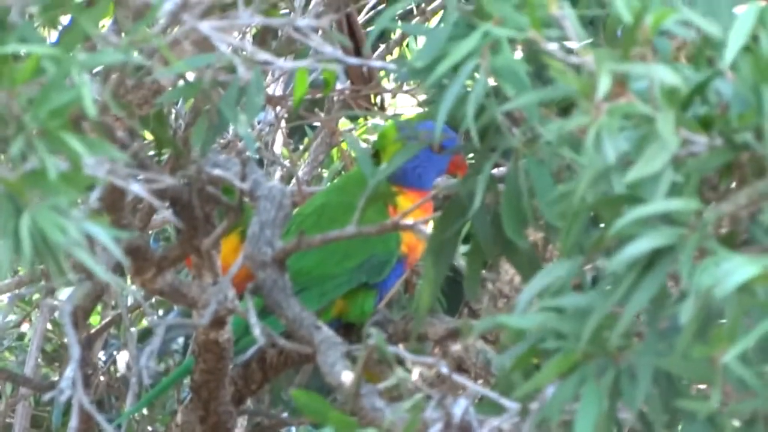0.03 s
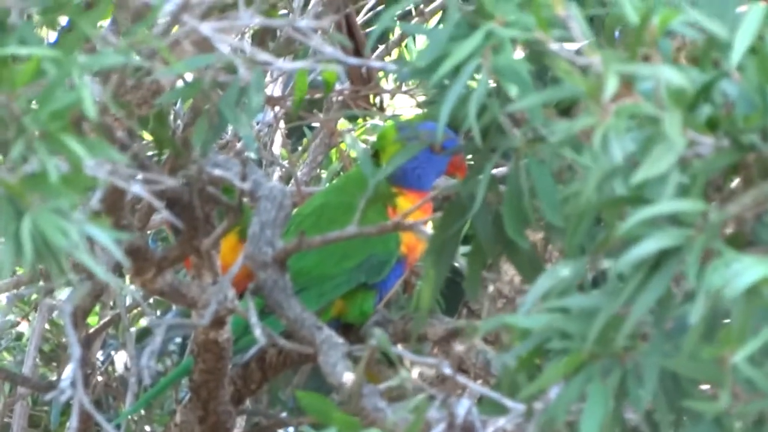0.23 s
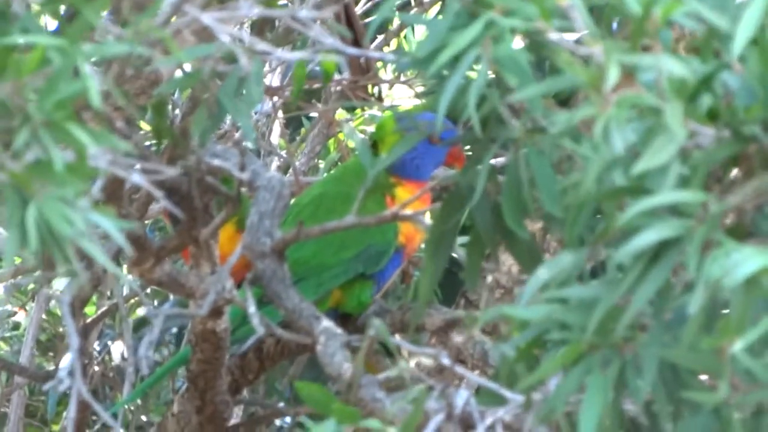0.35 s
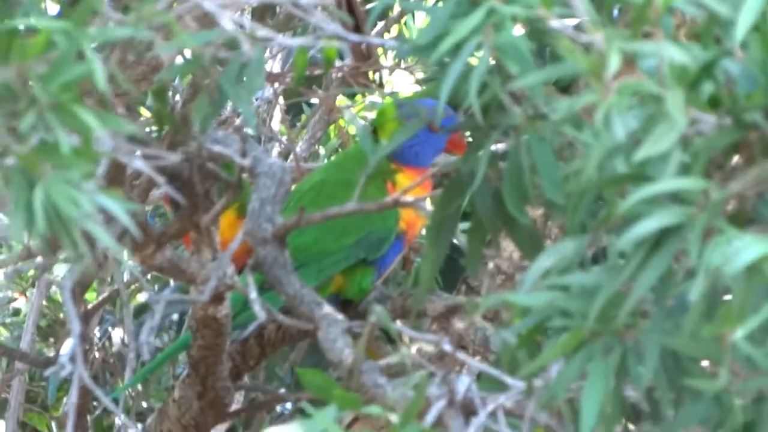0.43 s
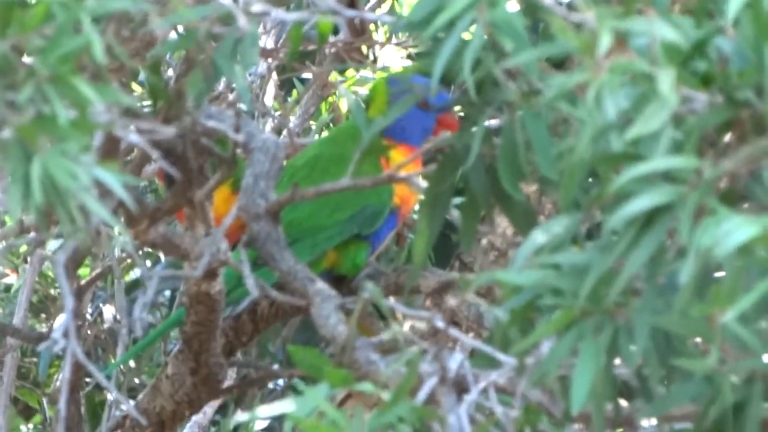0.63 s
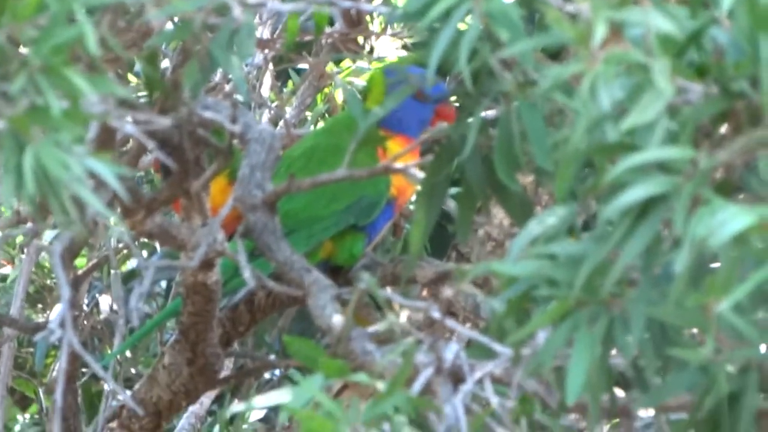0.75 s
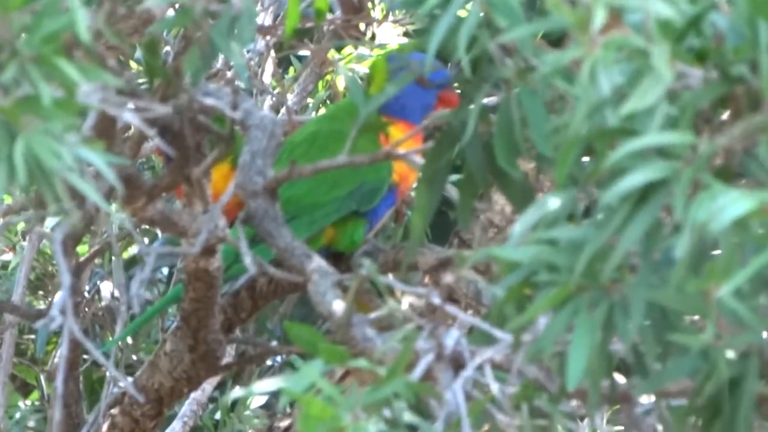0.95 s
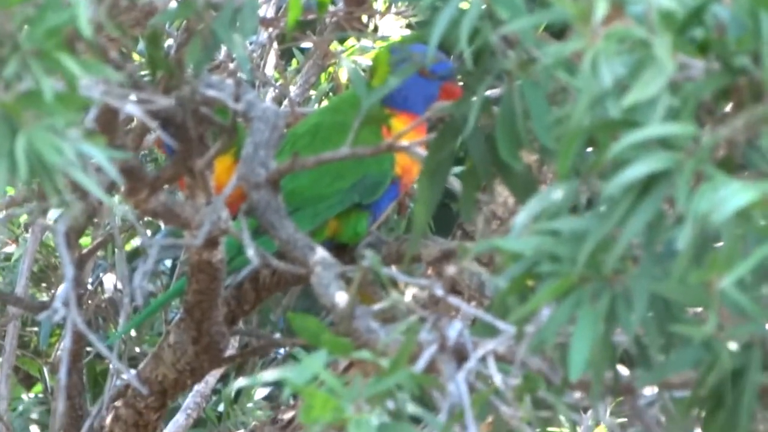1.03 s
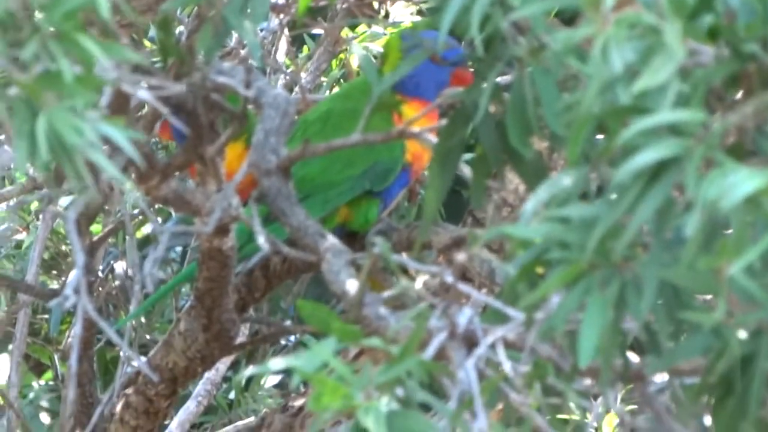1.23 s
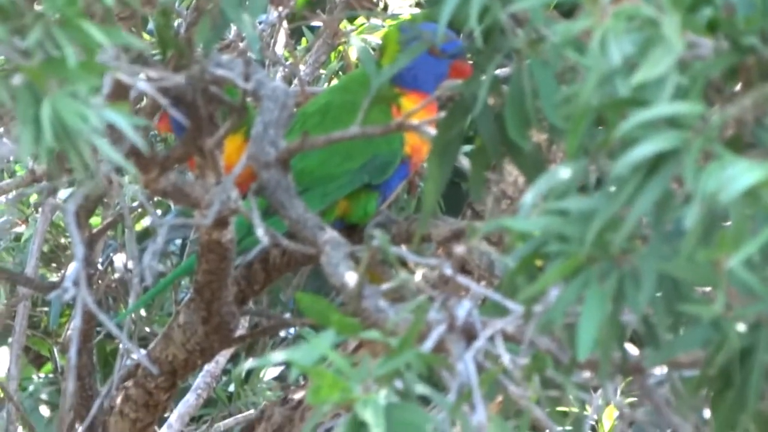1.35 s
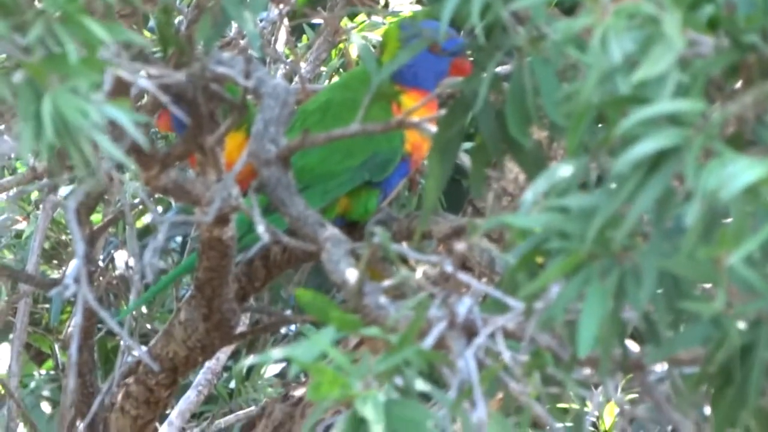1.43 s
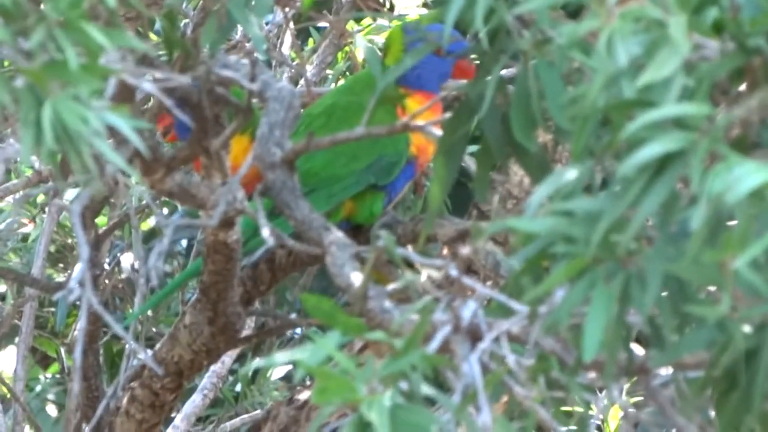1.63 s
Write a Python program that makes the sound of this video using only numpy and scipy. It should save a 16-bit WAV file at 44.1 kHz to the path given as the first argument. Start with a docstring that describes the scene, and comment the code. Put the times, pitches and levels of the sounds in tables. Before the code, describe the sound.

Quiet, quick bird chatter comes first, then a pause and one piercing, raspy parrot screech sliding downward; its echo fades into airy outdoor hiss and a faint far drone, heard in stereo from nearby.

```python
"""In a leafy tree, a lorikeet chatters softly, then gives one harsh squawk that falls by about an octave.
The squawk is a jittery stack of partials, some at thirds of its pitch; a second, higher tone joins near the end.
The chatter and second tone are short gliding notes. Decaying noise echoes scatter the voice off the leaves.
Behind are filtered-noise outdoor hiss and a faint drone of steady multiples, like a far small engine."""
import sys
import numpy as np
from scipy import signal
from scipy.fft import rfft, irfft
from scipy.io import wavfile

SR = 44100
rng = np.random.default_rng(int(sys.argv[2]) if len(sys.argv) > 2 else 0)


def inscribe(sig):
    """Save sig as 16-bit PCM at rate SR to the path in sys.argv[1].

    A 1-D sig is mono; a 2-D sig holds one channel per row.
    Samples are clipped to [-1, 1] before scaling.
    """
    pcm = np.round(np.clip(np.atleast_2d(sig).T, -1, 1) * 32767)
    wavfile.write(sys.argv[1], SR, pcm.astype(np.int16))


N = 74970
TIME = np.arange(N) / SR
SIDES = np.array([[1], [-1]])  # sign of a left-right difference in each ear
CUTOFF_HZ = 15650  # top of the whole sound
JITTER_HZ = 160  # fastest wander of the bird's pitch


def from_db(db):
    """Turn decibels into gain."""
    return 10 ** (np.asarray(db) / 20)


def rms_one(x):
    """Scale to unit power."""
    return x / np.sqrt(np.mean(np.abs(x) ** 2) + 1e-20)


def in_time(rows):
    """Turn each column of a table into a curve over time."""
    s, *columns = np.transpose(rows)
    return [np.interp(TIME, s, column) for column in columns]


def at_hz(points, hz):
    """Read a spectrum on a log-frequency axis."""
    table_hz, table_db = np.transpose(points)
    return np.interp(np.log(hz), np.log(table_hz), table_db)


def butter(order, hz, kind="low"):
    """Design a smooth filter that passes one side of a frequency, or a band."""
    return signal.butter(order, hz, kind, fs=SR, output="sos")


def drift(hz, size=N):
    """Random wander, made of noise below the given rate, with a spread of about 1."""
    run_in = 4000  # samples dropped while the filter settles
    noise = rng.standard_normal(size + run_in)
    return rms_one(signal.sosfilt(butter(2, hz), noise))[run_in:]


def partial(phase, rough, width_hz):
    """One partial, with a share of its power smeared into a band around it."""
    rough, size = np.clip(rough, 0, 1), len(phase)
    clean = np.sqrt(2 * (1 - rough)) * np.cos(phase)
    smeared = drift(width_hz, size) * np.cos(phase) + drift(width_hz, size) * np.sin(phase)
    return clean + np.sqrt(rough) * smeared


# how the squawk's voice changes: start_s, pitch_hz, roughness (0-1, before the shares below),
# thirds_db (partials between whole multiples), fundamental_db (extra), tilt_db (per octave above the pitch)
SQUAWK = [(0.575, 2587, 0.16, 0.5, 19, 7), (0.594, 2700, 0.17, -3.5, 3, 7), (0.612, 2566, 0.1, -6.5, 9, 4),
          (0.617, 2083, 0.3, -13.5, 0.5, -3), (0.643, 2008, 0.18, -18, 3, -1.5),
          (0.668, 1900, 0.5, -0.5, 12.5, 1.5), (0.695, 1786, 0.34, -9, 13, 1.5),
          (0.722, 1675, 0.42, -11, -0.5, -2.5), (0.755, 1614, 0.28, -16.5, 13.5, 0),
          (0.79, 1469, 0, -17.5, 7.5, -2.5), (0.825, 1476, 0.52, -4.5, 8, 1),
          (0.85, 1368, 0.24, -12, 2, -3.5), (0.89, 1338, 1, 1, -4, -6.5), (0.93, 1308, 0.37, 0, 11.5, -1),
          (0.968, 1320, 0.4, -3, 6.5, -1), (1.02, 1220, 0.77, 2.5, 13, 1.5)]
# how hard the bird calls: start_s, level_db (before SQUAWK_DB)
EFFORT = [(0.57, -86), (0.578, -48.5), (0.588, -38), (0.636, -35.5), (0.766, -36), (0.772, -41),
          (0.824, -37), (0.942, -45.5), (0.984, -42), (1.04, -55.5)]
# fixed tone colour of the throat: frequency_hz, boost_db
THROAT = [(1200, -3), (1800, -8.5), (2400, 7), (2900, -1.5), (3400, 3.5), (4200, -1), (4800, -1.5),
          (5400, -6), (6000, -3), (6900, -11.5), (8300, -7.5), (9500, -18.5), (10800, -36), (12000, -26),
          (14000, -60)]
# a moving throat resonance, mostly sinking: start_s, centre_hz, boost_db (negative is a dip)
RESONANCE = [(0.58, 6010, 14), (0.635, 5840, 7.5), (0.67, 4550, 6.5), (0.71, 3520, -4), (0.75, 5012, 6.5),
             (0.80, 4400, -9), (0.85, 4050, 6), (0.88, 3170, 10.5), (0.92, 2450, 9), (0.965, 3150, 10),
             (1.01, 3180, 5)]
RESONANCE_WIDTH_HZ = 390  # from the centre to half the boost in dB
SQUAWK_DB, CLOSE_S, RELEASE_DB_PER_S = -3.5, 1.055, 254
SQUAWK_JITTER = 0.013  # spread, as a share of the pitch
RASP_HZ, FLUTTER_DB, FLUTTER_HZ = 158, 0.7, 108
BETWEEN_ROUGH, FUNDAMENTAL_ROUGH, OVERTONE_ROUGH = 0.81, 0.54, 0.58  # shares of the roughness


def squawk():
    """A falling, jittery tone with rough partials at thirds of its pitch, shaped by the throat."""
    pitch, rough, thirds_db, fundamental_db, tilt_db = in_time(SQUAWK)
    effort_db, = in_time(EFFORT)
    centre_hz, boost_db = in_time(RESONANCE)
    jittery_pitch = pitch * (1 + SQUAWK_JITTER * drift(JITTER_HZ))
    phase = 2 * np.pi * np.cumsum(jittery_pitch) / SR
    out, power = 0, 0
    for step in range(3, 28):  # thirds of the pitch, from the fundamental to the ninth multiple
        multiple = step / 3
        between = step % 3 > 0
        hz = multiple * pitch
        resonance_db = boost_db / (1 + ((hz - centre_hz) / RESONANCE_WIDTH_HZ) ** 2)
        gain_db = at_hz(THROAT, hz) + resonance_db + tilt_db * np.log2(multiple)
        share = OVERTONE_ROUGH
        if between:
            gain_db, share = gain_db + thirds_db, BETWEEN_ROUGH
        elif multiple == 1:
            gain_db, share = gain_db + fundamental_db, FUNDAMENTAL_ROUGH
        gain = from_db(gain_db) * (hz < CUTOFF_HZ)
        start_phase = rng.uniform(0, 2 * np.pi)
        out = out + gain * partial(multiple * phase + start_phase, rough * share, RASP_HZ)
        power = power + gain ** 2
    release_db = RELEASE_DB_PER_S * np.maximum(TIME - CLOSE_S, 0)
    level_db = SQUAWK_DB + effort_db + FLUTTER_DB * drift(FLUTTER_HZ) - release_db
    # dividing by the power lets the effort alone set the loudness
    return out / np.sqrt(power) * from_db(level_db) * (TIME > EFFORT[0][0])


# second tone in the squawk: start_s, length_s, first_pitch_hz, last_pitch_hz, level_db, roughness (0-1),
# second_partial_db, third_partial_db (both relative to the first)
SECOND_TONE = [(0.895, 0.035, 2434, 2290, -51, 0.5, -35, -9.5),
               (0.953, 0.043, 2720, 2473, -44.5, 0.04, -23, -20.5),
               (0.958, 0.0296, 3150, 2907, -44, 0.54, -18.5, -24),
               (0.981, .02, 2480, 2298, -43.5, 0.07, -27, -6),
               (0.998, 0.0327, 2407, 2320, -53.5, .15, 0.5, 2)]
# soft chatter: start_s, length_s, first_pitch_hz, last_pitch_hz, level_db, roughness (0-1),
# second_partial_db, third_partial_db (both relative to the first)
CHATTER = [(0.038, 0.017, 2270, 2280, -55, 0.28, -5, 0.5),
           (0.060, 0.025, 2353, 2480, -58.5, 0.75, -4.5, -8),
           (0.088, 0.0375, 2390, 2217, -61.5, 0.65, -25, -28), (0.153, .014, 2114, 2640, -51.5, 0.9, 3, -2),
           (0.167, .018, 2750, 2310, -53, 0.56, 3, -8), (0.209, 0.013, 2067, 2314, -49.5, 0, -4.5, -6),
           (0.2175, 0.0075, 2170, 2450, -45.5, 0.54, 16, 0), (0.220, .014, 3110, 2960, -51, 0.1, -11, -15),
           (0.227, 0.02, 2290, 2340, -54.5, 0.5, -1, -24), (0.272, 0.011, 2114, 2510, -53, 0.4, -10, -26),
           (0.283, 0.032, 2830, 2976, -57.5, .6, -10, -17), (0.314, 0.033, 3100, 3130, -52, 0, 7, -15),
           (0.320, 0.021, 2313, 2436, -55, 0.97, 5, -2), (0.336, 0.0187, 2332, 2527, -45, 0.23, 3, -6.5),
           (0.356, 0.019, 3144, 3044, -52.5, 0.3, -14, -21), (0.358, 0.017, 2424, 2500, -52, 0.65, 11, -1),
           (0.369, 0.0233, 2174, 2030, -48, 0.42, 15.5, 8.5), (0.399, .013, 2143, 2497, -48, 0.6, 2, -10),
           (0.413, 0.024, 2470, 2630, -56.5, 1, -0.5, -7)]
NOTE_EDGE_S, NOTE_RASP_HZ, NOTE_TOP_HZ = 0.0045, 308, 9660
NOTE_JITTER = 0.014  # spread, as a share of the pitch
FOURTH_PARTIAL_DB = -13  # relative to the third


def notes(rows):
    """Short gliding notes, each a stack of four rough partials."""
    out, t = np.zeros(N), TIME[:SR // 10]
    for start_s, length_s, first_hz, last_hz, level_db, rough, second_db, third_db in rows:
        glide = np.interp(t, [0, length_s], [first_hz, last_hz])
        pitch = glide * (1 + NOTE_JITTER * drift(JITTER_HZ, len(t)))
        phase = 2 * np.pi * np.cumsum(pitch) / SR
        partials_db = [0, second_db, third_db, third_db + FOURTH_PARTIAL_DB]
        gains = rms_one(from_db(partials_db)) / 2  # the four powers add up to 1
        tone = sum(gain * partial(k * phase, rough, NOTE_RASP_HZ * np.sqrt(k))
                   for k, gain in enumerate(gains, 1))
        fade_in = np.clip(t / NOTE_EDGE_S, 0, 1)
        fade_out = np.clip((length_s - t) / NOTE_EDGE_S + 0.5, 0, 1)
        start = int(start_s * SR)
        out[start:start + len(t)] += from_db(level_db) * fade_in * fade_out * tone
    return signal.sosfilt(butter(12, NOTE_TOP_HZ), out)


# echoes: level before WET_DB, decay to 1/e (leaves) or by 60 dB (tails), left-right share
LEAVES_DB, LEAVES_S, TAIL_DB, TAIL_T60_S, ECHO_WIDTH = -8.5, 0.027, -5.5, 0.44, 0.18
LOW_TAIL_DB, LOW_TAIL_T60_S, LOW_TAIL_HZ, LOW_TAIL_WIDTH = -6.5, 1, 1900, 0.27
WET_DB = 0.5  # added to every echo
VOICE_FLOOR_HZ, LOW_PAN_DB = 735, 3.5  # positive pan is louder on the left


def foliage(voice, pan_db):
    """The direct sound, a quick scatter off nearby leaves, a tail from the garden and a longer, wider dull one."""
    t = TIME[:SR]
    voice = signal.sosfilt(butter(3, VOICE_FLOOR_HZ, "high"), voice)
    low = signal.sosfiltfilt(butter(3, LOW_TAIL_HZ), voice)
    out = (voice - low) * from_db(pan_db / 2 * SIDES) + low * from_db(LOW_PAN_DB / 2 * SIDES)
    echoes = [
        (voice, LEAVES_DB, np.exp(-t / LEAVES_S), ECHO_WIDTH),
        (voice, TAIL_DB, from_db(-60 * t / TAIL_T60_S), ECHO_WIDTH),
        (low, LOW_TAIL_DB, from_db(-60 * t / LOW_TAIL_T60_S), LOW_TAIL_WIDTH),
    ]
    for source, level_db, decay, width in echoes:
        mid, side = rng.standard_normal((2, len(t))) * decay / np.sqrt(np.sum(decay ** 2))
        echo = signal.fftconvolve(source[None], mid + width * side * SIDES, axes=1)[:, :N]
        out = out + from_db(level_db + WET_DB) * echo
    return out


# far engine: start_s, firing_rate_hz, drone_level_db, whine_level_db
ENGINE = [(0, 149.3, -77, -85), (0.5, 150, -76, -90), (0.75, 166.1, -70, -80), (1.08, 162.6, -64, -81),
          (1.218, 163.1, -70, -68), (1.235, 160, -65.5, -61.5), (1.355, 160, -72, -60),
          (1.375, 161.3, -67.5, -71), (1.455, 162.8, -64.5, -71), (1.485, 162.4, -68, -66),
          (1.64, 162.8, -68, -64.5), (1.7, 161.2, -67, -76)]
# tones in the drone: multiple (of the firing rate), level_db (relative)
ENGINE_ORDERS = [(4, -5.5), (5, -10.5), (6, -0.5), (7, 2.5), (8, 0), (9, -7), (11, -12), (13, -6.5),
                 (14, -2), (16, -1.5)]
WHINE_ORDER = 10  # multiple of the firing rate
ENGINE_ROUGH, WHINE_ROUGH, ENGINE_WAVER_HZ = 0.22, 0.16, 18
EXHAUST_DB, EXHAUST_LOW_HZ, EXHAUST_HIGH_HZ = -0.5, 670, 1750  # level relative to the drone
EXHAUST_WIDTH = 0.18  # left-right share


def engine():
    """A far drone whose orders waver on the way, with the rush of its exhaust; one order swells into a whine."""
    firing_hz, drone_db, whine_db = in_time(ENGINE)
    phase = 2 * np.pi * np.cumsum(firing_hz) / SR
    drone = rms_one(sum(from_db(level_db) * partial(k * phase, ENGINE_ROUGH, ENGINE_WAVER_HZ)
                        for k, level_db in ENGINE_ORDERS))
    exhaust_band = butter(2, [EXHAUST_LOW_HZ, EXHAUST_HIGH_HZ], "band")
    mid, side = signal.sosfilt(exhaust_band, rng.standard_normal((2, N)))
    exhaust = from_db(EXHAUST_DB) * rms_one(mid + EXHAUST_WIDTH * side * SIDES)
    whine = partial(WHINE_ORDER * phase, WHINE_ROUGH, ENGINE_WAVER_HZ)
    return from_db(drone_db) * (drone + exhaust) + from_db(whine_db) * whine


# colour of the outdoor hiss: frequency_hz, level_db (per Hz, relative)
AIR = [(30, -28), (80, -28.5), (170, -21.5), (330, -14.5), (500, -13), (700, -10.5), (1100, -6),
       (1800, -1.5), (2600, -2.5), (4000, -6.5), (6200, -3.5), (8000, -6.5), (9500, -12), (10500, -18.5),
       (12000, -24), (15500, -29.5)]
AIR_DB = -62.5  # overall level
# how alike the hiss is in the two ears: frequency_hz, likeness (0-1)
LIKENESS = [(30, .65), (120, 0.99), (700, 0.74), (1500, 0.59), (4000, 0.97), (12000, 0.96)]


def air():
    """Steady outdoor hiss: coloured noise, largely alike in both ears."""
    hz = np.maximum(np.fft.rfftfreq(N, 1 / SR), 1)
    mid, side = rfft(rng.standard_normal((2, N)))
    alike = np.clip(at_hz(LIKENESS, hz), 0, 1)
    both = np.sqrt(1 + alike) * mid + np.sqrt(1 - alike) * side * SIDES
    hiss = irfft(from_db(at_hz(AIR, hz)) * both, N)
    return from_db(AIR_DB) * rms_one(hiss)


def scene():
    """The bird in its tree over the engine and the hiss."""
    call = foliage(squawk() + notes(SECOND_TONE), pan_db=1.46)
    chatter = foliage(notes(CHATTER), pan_db=-1.9)
    return call + chatter + engine() + air()


def record(dry):
    """Cut the top steeply."""
    steep_cut = signal.ellip(12, 0.1, 70, CUTOFF_HZ, fs=SR, output="sos")
    return signal.sosfilt(steep_cut, dry)


dry = scene()
out = record(dry)
inscribe(out)
```